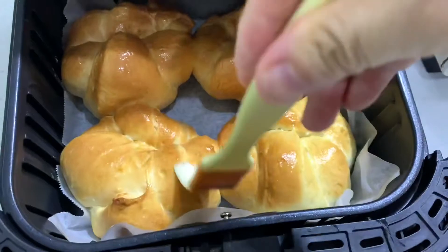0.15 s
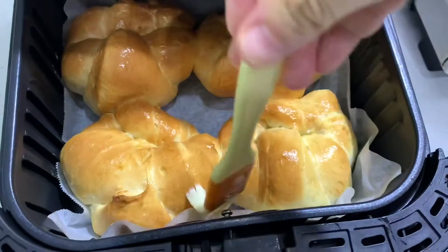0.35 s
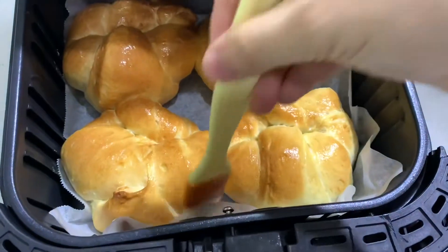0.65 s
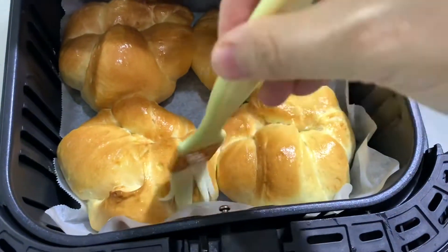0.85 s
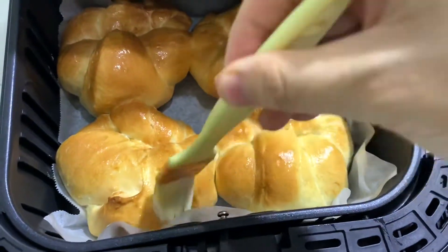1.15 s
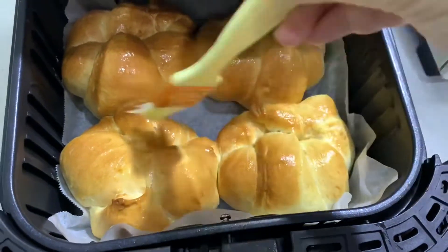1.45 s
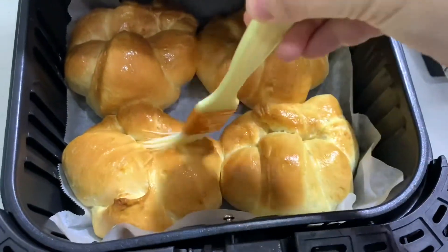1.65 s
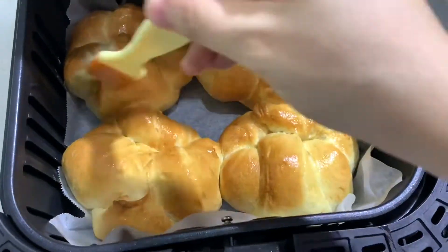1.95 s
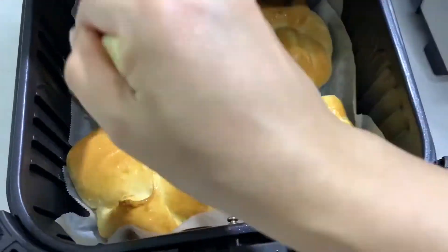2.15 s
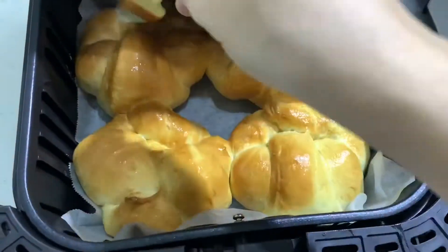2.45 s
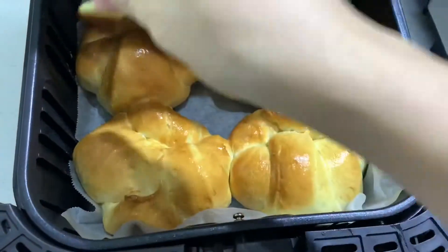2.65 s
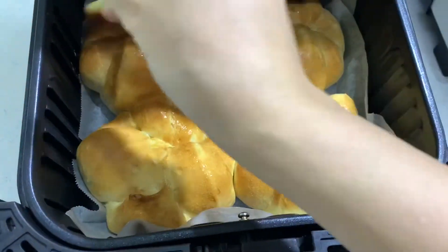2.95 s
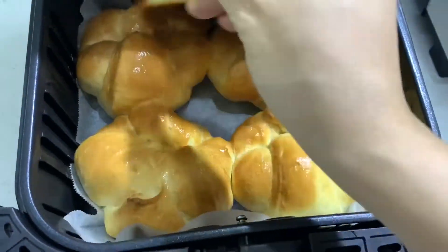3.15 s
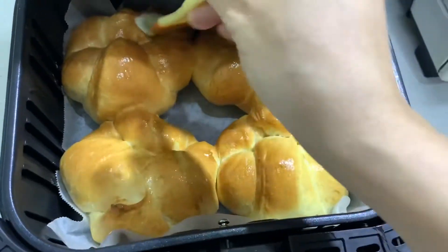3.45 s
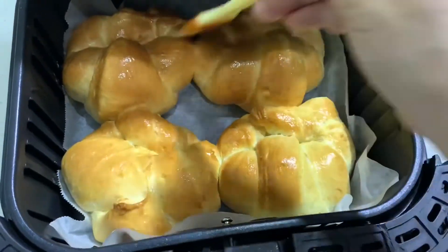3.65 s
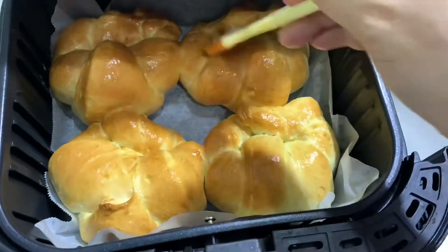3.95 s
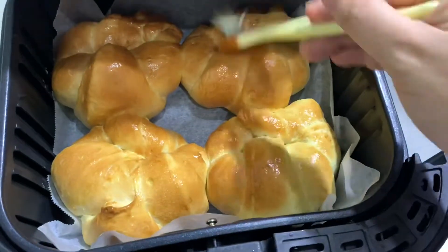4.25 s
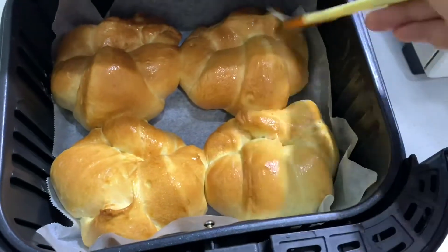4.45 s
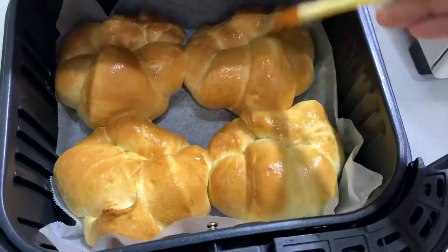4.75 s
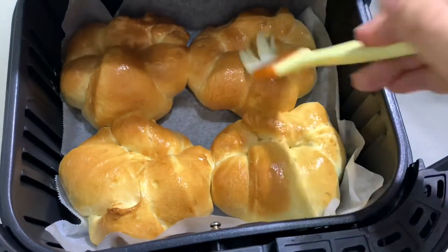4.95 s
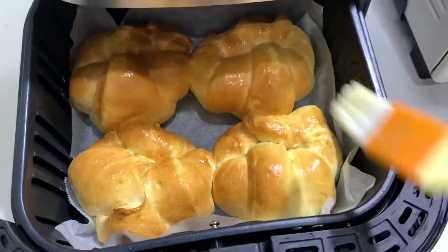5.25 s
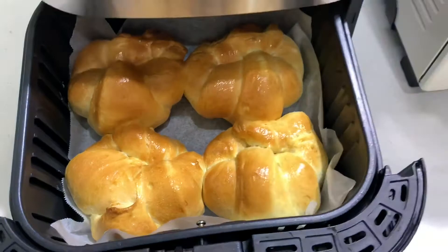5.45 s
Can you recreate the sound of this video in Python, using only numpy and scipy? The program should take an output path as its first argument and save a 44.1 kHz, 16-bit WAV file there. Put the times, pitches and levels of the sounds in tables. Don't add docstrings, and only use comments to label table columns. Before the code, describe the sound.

Close papery crackles and faint bristle swishes as rolls are brushed in a basket, with dull handling bumps and steady fan noise.

```python
import sys
import numpy as np
from scipy import signal
from scipy.io import wavfile
from scipy.ndimage import uniform_filter1d

SR = 44100
rng = np.random.default_rng(int(sys.argv[2]) if len(sys.argv) > 2 else 0)


def ratio_of_db(decibels):
    return 10 ** (np.asarray(decibels, float) / 20)


def file_out(sig):
    cols = np.atleast_2d(sig).T
    lim = np.clip(cols, -1, 1)
    pcm = np.round(lim * 32767).astype(np.int16)
    wavfile.write(sys.argv[1], SR, pcm)


N = 246519

# start_s, level_db, brightness_db, half_ms (time to fall by half)
NEAR_SNAPS = [(0.1646, -34, 2.5, 1.4), (0.17, -47, 13, 3.1), (0.198, -50, 4, 2.1), (0.325, -52, 15, 1.9),
              (0.34, -38.5, 3.5, 3.3), (.5254, -41, -5, 2.5), (.533, -52, 1.1, 4.3), (.5422, -45.5, 7, 9.6),
              (0.5626, -44, 11, 2), (0.588, -43, 12, .8), (.5957, -44, 12, 3.2), (0.6064, -43, 9, 1.7),
              (.6976, -31.5, 1.5, 5.6), (0.7065, -27, 12.5, 1.6), (.712, -50, 14, 2.4), (0.733, -38, 3, 3),
              (0.7586, -45, 4, 2.3), (0.8547, -31, 6, 4.5), (.862, -46, 7, 3.1), (.8747, -44, 6, 10),
              (.9225, -45, 11, 3.1), (1.014, -42, 0, 11), (1.0531, -52, 9, 2.2), (1.067, -52, 7, 3.4),
              (1.147, -45.5, 4, 6), (1.138, -56, -6, 4), (1.162, -44, 4, 7), (1.203, -48, 5, 3.2),
              (1.2899, -51, -6, 5.2), (1.297, -52, 3, 2.6), (1.3345, -47, 8, 1)]
# start_s, level_db, brightness_db, half_ms
FAR_SNAPS = [(2.2924, -64, -7, 2.6), (2.298, -56, -2.1, 3.8), (2.625, -53, -11, 1.9), (2.644, -55.5, 1, 22),
             (2.766, -59.5, 5, 4.5), (2.849, -44, 5, 1.5), (2.842, -51, -6, 3), (2.835, -55, -6, 8),
             (2.889, -51.5, -14, 3.9), (2.899, -46, 2, 1.1), (2.914, -56, -8, 4.3), (2.9221, -57, 9, 4),
             (2.956, -58, -1.1, 23), (2.977, -50, 2, 3.4), (2.9875, -44, -12, 1.8), (2.9995, -42, -5, 7.3),
             (3.5094, -41, -9, 1.4), (3.7495, -52, -6, 3.7), (3.742, -56, 8, 8), (3.798, -57.5, 7, 8.2),
             (3.9689, -39, -4, 1.1), (4.1254, -52, -12, 3.4), (4.207, -48, -2.1, 1.2),
             (4.2955, -54, -11, 4.6), (4.386, -48, 9, 3), (4.3911, -29, 6, 5), (4.397, -37, 6, 4.4),
             (4.412, -45, -14, 6.8), (4.4206, -38.5, -4, 8.6), (5.082, -45, 3, 9.3), (5.0874, -31, 1, 4.9),
             (5.095, -39.5, -11, 2.5)]
# start_s, level_db, brightness_db
RUSTLES = [(.313, -58, 0), (.495, -58, 7), (.6745, -65, 6), (.9917, -61.5, 18), (1.2268, -65, 10),
           (1.3267, -61, 1), (1.4757, -70, 8), (1.82, -67, 8), (1.9003, -64, -2), (2.23, -66, 2),
           (2.0176, -59.5, -2), (2.0876, -65, 1), (2.1752, -63, 0), (2.3618, -65.5, 4), (2.5801, -65, 1),
           (2.6055, -62, .1), (2.83, -58.5, -8), (3.2267, -68, 9), (3.466, -67, 12), (3.5449, -65, 9),
           (3.78, -63, -6), (3.9243, -65, 6), (3.985, -53.5, -16), (4.2285, -57, -6), (4.433, -58, .1),
           (4.4895, -60, -5), (4.6842, -64.5, 4), (4.8128, -63, 1.5), (4.876, -63, 0), (5.105, -62, -2)]
# start_s, peak_db, brightness_db
TICKS = [(.1634, -23, 0), (.325, -37, 14), (.3393, -28, 5), (.342, -27, 5), (.5245, -29, 0),
         (.5627, -31, 5), (.5864, -17, 16), (.595, -37, 10), (.602, -25, 10), (.6049, -21, 18),
         (.6965, -20, 3), (.7055, -17, 9), (.8535, -24, 8), (.92, -32, 13), (.9227, -29, 15),
         (1.0095, -31, 6), (1.0125, -31, -6), (1.0655, -40, 10), (1.1373, -38, -6), (1.1453, -28, 2),
         (1.158, -36, 0), (1.165, -35, 3), (1.1877, -42, -8), (1.2017, -37, 4), (1.2062, -38, -6),
         (1.289, -36, -20), (1.2932, -31, -5), (1.2958, -27, 10), (1.3261, -37, -14), (1.3334, -28, 7),
         (1.8442, -43, -15), (1.8992, -45, -12), (2.0438, -48, 0), (2.0662, -48, -16), (2.624, -26, -8),
         (2.648, -41, -10), (2.8415, -35, -2), (2.8473, -23, 2), (2.8727, -41, -8), (2.888, -34, 6),
         (2.8976, -26, 2), (2.9211, -36, 9), (2.9304, -40, -8), (2.9751, -33, 6), (2.9795, -31, -8),
         (2.986, -25, -6), (3.0, -33, -10), (3.7485, -32, -14), (3.9675, -28, -8), (4.126, -39, -17),
         (4.2061, -33, -5), (4.296, -41, -8), (4.39, -18, 6)]
# pitch_hz, width_hz, level_db
DULL_PAPER = [(2350, 390, 8.5), (2830, 1850, 5.5), (3770, 2100, -26)]
# pitch_hz, width_hz, level_db
CRISP_PAPER = [(4800, 3300, -3), (7050, 1300, 3), (8860, 950, 3)]
# pitch_hz, width_hz, level_db
FINE_PAPER = [(10400, 2400, 4.5), (12640, 2440, 7.5), (15140, 1600, 10)]
# time_s, effort_db
SWEEP = [(0, -25), (.2, 5), (.36, 4), (.5, 10), (1.04, 9), (1.17, -11), (1.4, -23), (1.79, -36), (2.1, 0),
         (2.35, -24), (2.6, 11), (2.74, -2), (2.83, 11), (3.03, -3), (3.87, -1), (4.78, -1), (5.12, -9),
         (5.59, -9)]
# start_s, level_db, half_ms (time to fall by half)
KNOCKS = [(0.1647, -36, 2.5), (.199, -46, 1.9), (0.526, -38, 2.8), (.533, -41, 4.3), (.5422, -44.5, 11),
          (0.6043, -40, 1.7), (.6976, -42, 4), (0.7058, -31.5, 2.7), (0.732, -41, 2.9), (.853, -35, 6.7),
          (.8747, -45, 11), (0.921, -47, 2.6), (1.0116, -45, 11), (2.2913, -39, 1.9), (3.51, -35, 4.2),
          (3.9684, -36, 1.8), (3.979, -42, 19), (3.9912, -42, 13), (4.1262, -40, 3.7), (4.2064, -36.5, 1.2),
          (4.2285, -49, 19), (4.3906, -28, 6.2), (4.399, -26.5, 4), (4.412, -29.5, 5), (4.4216, -38, 7.5),
          (4.433, -36.5, 6.8), (4.4895, -48.5, 32), (4.877, -46, 3.8), (5.0868, -25.5, 3.8),
          (5.096, -46, 2.8)]
# pitch_hz, width_hz, level_db
BASKET = [(450, 128, 9.5), (796, 600, 4), (1288, 600, 0), (2040, 830, -0.5)]
# start_s, pitch_hz, level_db, t60_s
TAPS = [(.166, 727, -34.5, 0.16), (.526, 734, -40, 0.098), (3.508, 1080, -26, 0.022),
        (3.507, 2450, -43, 0.019), (3.969, 1123, -35.5, 0.095), (3.969, 1570, -31, 0.029),
        (4.125, 1590, -40, 0.034), (4.390, 2870, -18.5, 0.021), (4.390, 2220, -30, 0.16),
        (4.411, 1387, -29, 0.088), (5.087, 2100, -29, 0.058), (5.092, 918, -28.5, 0.082),
        (.705, 2440, -37, .05), (.5245, 4830, -25, 0.021), (1.3332, 4700, -27, .007),
        (3.5075, 4800, -34, 0.018), (2.269, 795, -32, .02), (2.292, 1300, -34, .015),
        (2.345, 1110, -31, 0.016), (2.386, 1200, -40, .015), (3.417, 480, -32, .015),
        (4.2062, 2500, -40, 0.014), (3.985, 1245, -39, .09), (5.087, 8400, -28, .018),
        (5.089, 9300, -28, .018), (4.3905, 7600, -25, 0.022), (4.394, 7500, -28, .02),
        (3.508, 1300, -29, .02), (5.0865, 15300, -30, .012)]
# time_s, late_samples
RIGHT_LATE = [
    (0, 3),
    (1.55, 3),
    (1.6, 0),
    (5.59, 0),
]
# time_s, share_0_to_1
SHADE = [(0, 0), (1.5, 0), (1.65, .95), (3.1, .95), (3.45, .7), (4.3, .7), (4.38, .95), (5.59, .95)]
# centre_s, level_db, pitch_hz
JOLTS = [(0.1584, -38, 188), (.252, -37, 200), (0.3106, -36.5, 167), (0.3329, -33, 280), (.399, -37, 225),
         (1.1635, -34.5, 157), (1.1745, -29.5, 150), (1.1863, -43, 150), (1.2136, -35.5, 193),
         (1.238, -36.5, 278), (1.2474, -36.5, 169), (1.291, -35.5, 169), (1.3037, -32, 250),
         (1.323, -32, 267), (1.3304, -32.5, 128), (1.675, -35.5, 146), (2.272, -20, 300),
         (2.314, -28.5, 141), (2.3195, -21.5, 287), (2.3352, -33, 200), (2.3444, -30, 288),
         (2.354, -32, 177), (2.845, -38.5, 133), (3.4219, -25.5, 187), (3.426, -33, 120),
         (3.4352, -33.5, 129), (3.45, -31, 300), (3.512, -30, 180), (1.308, -33, 140), (3.462, -28.5, 192),
         (3.49, -35.5, 189), (3.5036, -22.5, 242), (3.522, -25.5, 228), (4.392, -38, 450)]
# centre_s, level_db, pitch_hz
SHUDDERS = [(.058, -42.5, 156), (0.136, -36, 191), (.185, -39, 136), (0.418, -39.5, 147), (0.458, -42, 193),
            (0.5013, -41.5, 198), (0.5547, -41, 365), (0.86, -46, 404), (1.226, -41, 158),
            (1.2773, -42, 260), (2.2927, -26.5, 177), (3.0514, -44.5, 276), (3.1576, -41.5, 375),
            (3.3103, -38, 380), (3.447, -39.5, 235), (3.476, -43, 180), (3.5373, -34.5, 320),
            (3.547, -35, 274), (4.2113, -33, 402), (4.419, -41, 464), (4.4934, -37.5, 363),
            (4.605, -45.5, 244), (4.882, -42, 335), (5.102, -45, 263)]
# pitch_hz, level_db (per Hz)
FAN_RUSH = [(45, -33), (70, -23.5), (100, -4), (160, -21), (250, -6.5), (400, -12), (600, -18.5),
            (1000, -17.5), (1600, -33), (2100, -32), (3500, -35), (7000, -37.5), (12000, -51), (16000, -70)]
# pitch_hz, width_hz, level_db
HUM = [(96.6, 41, -57.5), (232.8, 17, -49), (384.3, 73, -55.5), (855.5, 6.4, -61.5), (911, 32, -77),
       (1057, 19, -56.5), (1060, 300, -64), (2100, 760, -61)]
# pitch_hz, likeness_0_to_1
ALIKE = [(60, 1), (130, 0.68), (290, 0.99), (640, 0.43), (1400, 0), (3000, 0)]


def level(x, db):
    return x * ratio_of_db(db) / np.sqrt(np.mean(x ** 2))


def even(x):
    return x / np.sqrt(uniform_filter1d(np.mean(x ** 2, axis=0), size=160))


def band(x, hz, width):
    return signal.lfilter(*signal.iirpeak(min(hz, .45 * SR), hz / width, fs=SR), x)


def ring(x, modes):
    out = 0
    for k, (hz, width, db) in enumerate(modes):
        shaken = np.roll(x, 5 * k, axis=-1)
        out = out + ratio_of_db(db) * band(band(shaken, hz, width * 0.94), hz, width * 0.94)
    return out


def walk(rate):
    k = int(SR / rate)
    held = np.repeat(rng.standard_normal(N // k + 1), k)
    return 1.08 * uniform_filter1d(uniform_filter1d(held, k), k)[:N]


def grit(spread_db, apart):
    size = ratio_of_db(spread_db * np.minimum(rng.exponential(size=N), 3.5))
    return size * (rng.standard_normal(N) + apart * rng.standard_normal((2, N)))


def snap_envelope(s, db, half_ms, rise, crack_db, stretch, tail_db, tail_s):
    lead = 900
    power, t = np.zeros(N + SR), np.arange(-lead, 6000) / SR
    after = np.maximum(t + .001, 0)
    for at, peak_db, half in zip(s, db, half_ms / 1000):
        slow = max(half - .005, 0)
        crack = ratio_of_db(crack_db - 3500 * slow) ** 2 * np.exp(-after / 0.0013)
        tail = ratio_of_db(tail_db) ** 2 * np.exp(-after / tail_s)
        fall = crack + 4 ** (-after / (stretch * half)) + tail
        swell = np.exp(-(np.minimum(t + 0.00076, 0) / (0.00082 + rise * slow)) ** 2)
        start = int(at * SR) - lead
        power[start:start + len(t)] += ratio_of_db(peak_db) ** 2 * fall * swell
    return np.sqrt(power[:N])


def creases(clicks):
    clusters = ratio_of_db(3.4 * walk(450) + .3)
    rustle_half_ms = 11
    rows = NEAR_SNAPS + FAR_SNAPS + [(*row, rustle_half_ms) for row in RUSTLES]
    s, db, bright_db, half = np.transpose(rows)
    dull = snap_envelope(s, db - bright_db / 2, half, rise=1.0, crack_db=3.5, stretch=0.98,
                         tail_db=-18, tail_s=0.0041) * even(ring(clicks, DULL_PAPER))
    crisp = snap_envelope(s, db + 0.046 * bright_db, half, rise=0.81, crack_db=2.0, stretch=1.06,
                          tail_db=-15, tail_s=0.0029) * even(ring(clicks, CRISP_PAPER))
    fine = snap_envelope(s, db + bright_db / 2, half, rise=1.0, crack_db=0.0, stretch=1.0,
                         tail_db=-19, tail_s=0.0048) * even(ring(clicks, FINE_PAPER))
    return clusters * (ratio_of_db(0.64) * dull + ratio_of_db(2.12) * crisp + ratio_of_db(1.0) * fine)


def ticks(clicks):
    t, burst = np.arange(90) / SR, np.zeros((3, 2, N))
    fall_s = .0003
    for s, db, bright_db in TICKS:
        at = int(s * SR)
        here = clicks[:, at:at + len(t)]
        force = (here[0] + .3 * here) * np.exp(-t / fall_s)
        tilt = ratio_of_db(db + bright_db * np.array([-.5, 0, .5]) - abs(bright_db) / 2)
        burst[:, :, at:at + len(t)] += tilt[:, None, None] * force / np.sqrt(np.sum(force ** 2) / 2)
    dull, crisp, fine = ring(burst[0], DULL_PAPER), ring(burst[1], CRISP_PAPER), ring(burst[2], FINE_PAPER)
    return ratio_of_db(5.5) * dull + ratio_of_db(10.0) * crisp + ratio_of_db(7.0) * fine


def bristles():
    t = np.arange(N) / SR
    effort_db = np.interp(t, *np.transpose(SWEEP))
    patchy_db = 4.5 * walk(60) + 1.2 * walk(14)
    scrape = grit(1.4, apart=0.82)
    drag_db = -64 + 1.15 * t + 0.083 * effort_db + patchy_db
    drag = ratio_of_db(drag_db) * level(band(scrape, 2400, 2340), -2.34)
    air = band(band(scrape, 12000, 12000), 12000, 12000)
    return drag + ratio_of_db(-64 + effort_db + patchy_db) * level(air, -7)


def knocks():
    blows = even(grit(1.4, apart=0.35))
    hits = blows * snap_envelope(*np.transpose(KNOCKS), rise=0.12, crack_db=-6, stretch=1.19,
                                 tail_db=-9, tail_s=0.013)
    return ratio_of_db(-1.0) * ring(hits, BASKET) / np.std(ring(blows, BASKET))


def taps():
    out, t = np.zeros(N + SR), np.arange(9000) / SR
    for s, hz, db, t60 in TAPS:
        start = int(s * SR)
        out[start:start + len(t)] += ratio_of_db(db) * np.sin(2 * np.pi * hz * t) * 1000 ** (-t / t60)
    return out[:N]


def brush_in_basket():
    clicks = grit(1.15, apart=1.0)
    return creases(clicks) + bristles() + knocks() + taps() + ticks(clicks)


def space(x, room_db, room_t60):
    n = np.arange(N)
    delay = np.interp(n / SR, *np.transpose(RIGHT_LATE)).round().astype(int)
    late = np.maximum(n - delay, 0)
    lift = .27 * band(x, 2200, 2500)
    right = (x[1] - lift[1])[late]
    shade = np.interp(n / SR, *np.transpose(SHADE))
    right = right - 2 * shade * band(right, 5500, 3200)
    x = np.array([x[0] + lift[0], right])
    t = np.arange(SR // 2) / SR
    walls, room = rng.standard_normal((2, 2, len(t)))
    wall_db, wall_t60 = -13, .004
    near = level(band(walls, 3600, 8500) * 1000 ** (-t / wall_t60), wall_db)
    far = level(band(room, 4000, 12000) * 1000 ** (-t / room_t60), room_db)
    echo = (near + far) / np.sqrt(len(t))
    echo[0, 0] += 1.03
    echo[1, 0] += 1
    return signal.fftconvolve(x, echo, axes=1)[:, :N]


def shoves():
    out, force = np.zeros((2, N + SR)), np.zeros(N + SR)
    jolt_cycles, shudder_cycles = 1.86, 3.95
    rows = [(*row, jolt_cycles) for row in JOLTS] + [(*row, shudder_cycles) for row in SHUDDERS]
    reach = 1500
    t = np.arange(-reach, reach) / SR
    for (s, db, hz, cycles), (phase, twist) in zip(rows, rng.random((len(rows), 2))):
        length = cycles / hz
        start = int(s * SR) - reach
        port_phase = 0.17 * (twist - .5) * np.array([[1], [-1]])
        wave = np.cos(2 * np.pi * (hz * (t - 12 * t ** 2) + phase + port_phase))
        out[:, start:start + len(t)] += ratio_of_db(db + 4.5) * wave * np.exp(-(t / (0.4 * length)) ** 2)
        force[start:start + len(t)] += ratio_of_db(db) ** 2 * np.exp(-(t / (0.65 * length)) ** 2)
    skin = signal.sosfilt(signal.butter(4, 620, fs=SR, output="sos"), grit(5.0, apart=0.45))
    edge = level(band(skin, 333, 220), -8)
    sway = level(band(band(skin, 116, 60), 116, 60), -8.5)
    return (out[:, :N] + np.sqrt(force[:N]) * (edge + sway)) * ratio_of_db(np.array([[-.2], [.2]]))


def pair(hz, width):
    alike_hz, likeness = np.transpose(ALIKE)
    c = np.interp(np.log(hz), np.log(alike_hz), likeness)
    mid, side = band(band(rng.standard_normal((2, N)), hz, width), hz, width)
    return level(np.sqrt(1 + c) * mid + np.sqrt(1 - c) * side * np.array([[1], [-1]]), 0)


def kitchen():
    rush, swell = 0, walk(0.067)
    rush_hz, rush_db = np.transpose(FAN_RUSH)
    for hz in 30 * 2 ** (np.arange(28) / 3):
        db = np.interp(np.log(hz), np.log(rush_hz), rush_db) + 10 * np.log10(hz)
        rush = rush + ratio_of_db(db + 0.08 * swell + 0.8 * walk(6.7)) * pair(hz, hz / 2.51)
    hum = sum(ratio_of_db(db + 1.2 * walk(3)) * pair(hz, width) for hz, width, db in HUM)
    lull_s, lull_width_s, lull_db = 1.52, 0.24, -3
    lull = ratio_of_db(lull_db * np.exp(-((np.arange(N) / SR - lull_s) / lull_width_s) ** 2))
    rush = lull * level(rush, -47) * ratio_of_db(np.array([[-.7], [.7]]))
    return rush + np.sqrt(lull) * hum * ratio_of_db(np.array([[-.6], [.6]]))


def scene():
    return space(brush_in_basket(), room_db=-12, room_t60=0.2) + shoves() + kitchen()


def roll_off(x):
    return signal.sosfilt(signal.butter(12, 16970, fs=SR, output="sos"), x)


def record(dry):
    rounded = np.tanh(2 * dry) / 2
    lean = signal.sosfilt(signal.butter(3, 55, "high", fs=SR, output="sos"), rounded)
    dull = signal.sosfiltfilt(signal.butter(24, 15700, fs=SR, output="sos"), lean)
    mix = dull + ratio_of_db(-36) * (lean - dull)
    return roll_off(mix)


dry = scene()
out = record(dry)
file_out(out)
```